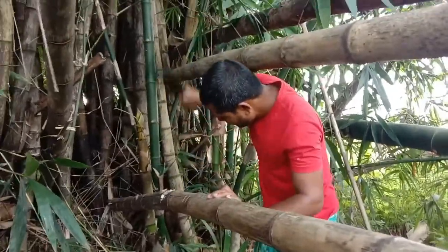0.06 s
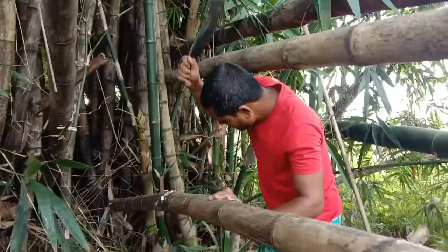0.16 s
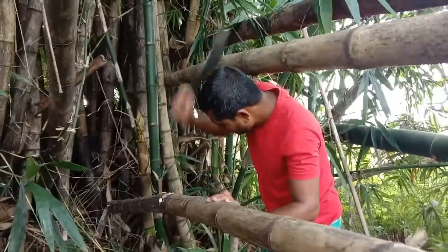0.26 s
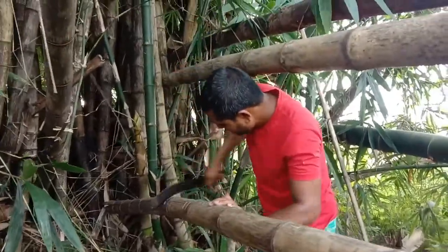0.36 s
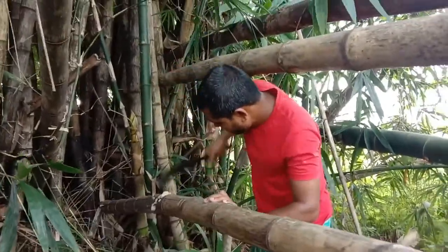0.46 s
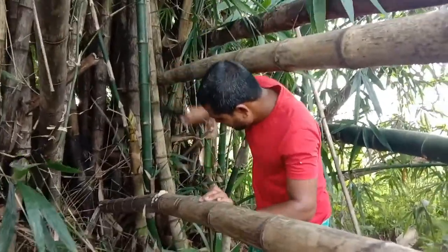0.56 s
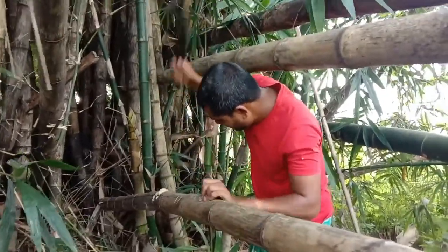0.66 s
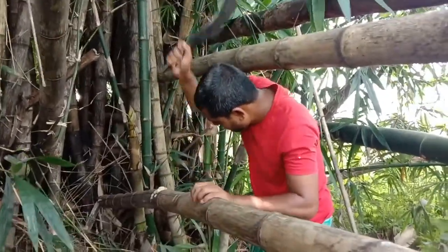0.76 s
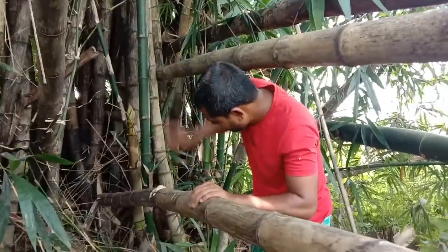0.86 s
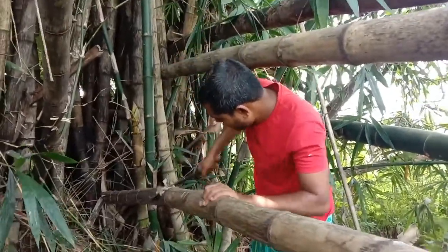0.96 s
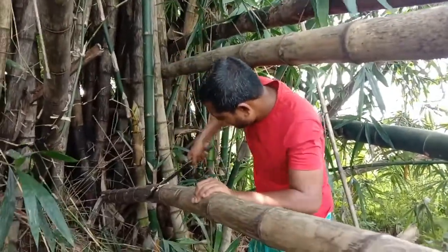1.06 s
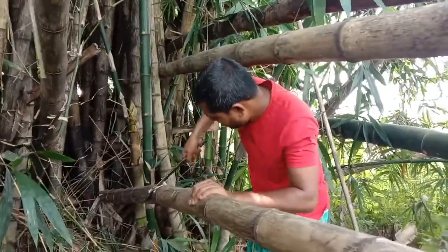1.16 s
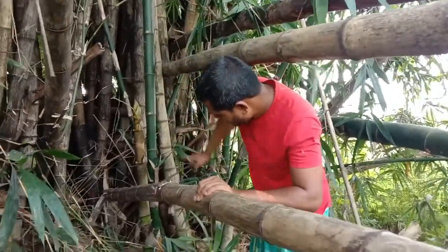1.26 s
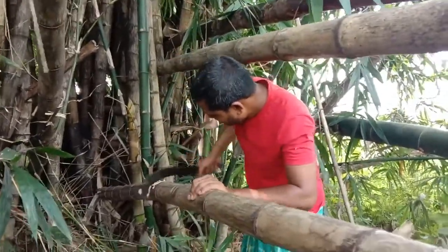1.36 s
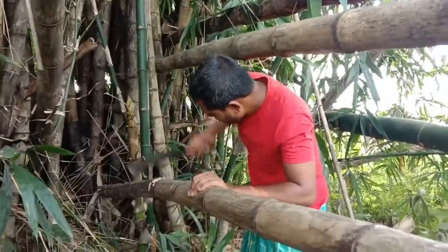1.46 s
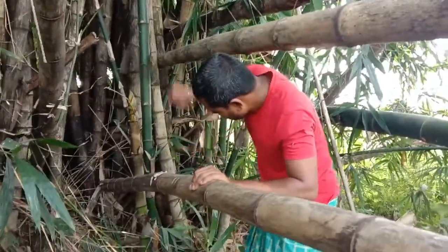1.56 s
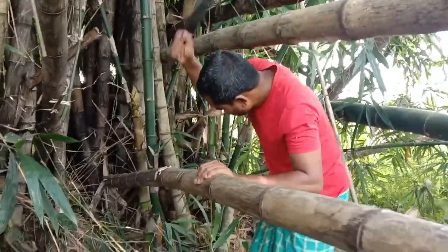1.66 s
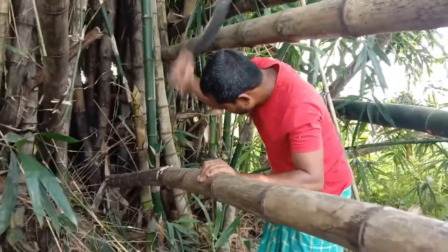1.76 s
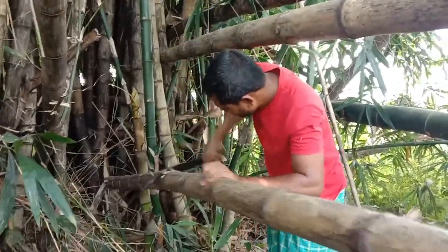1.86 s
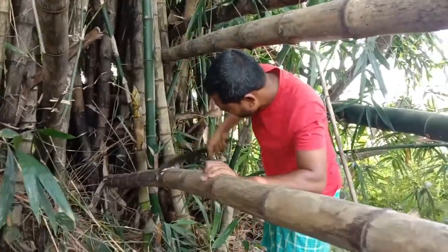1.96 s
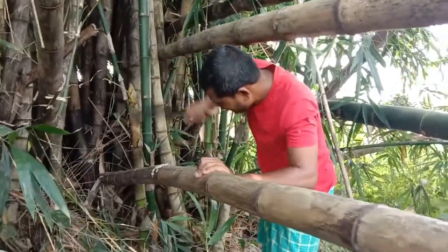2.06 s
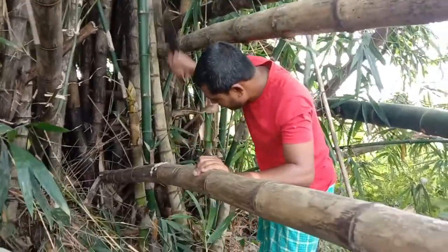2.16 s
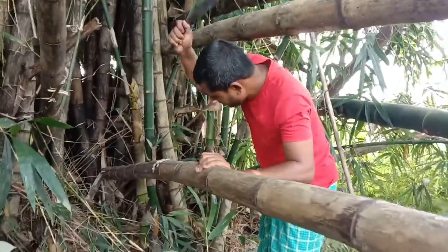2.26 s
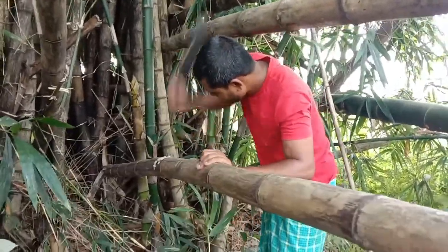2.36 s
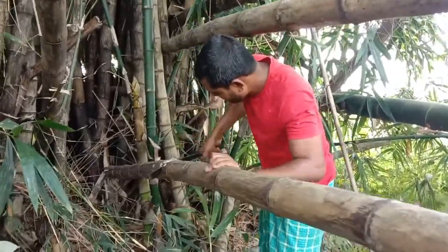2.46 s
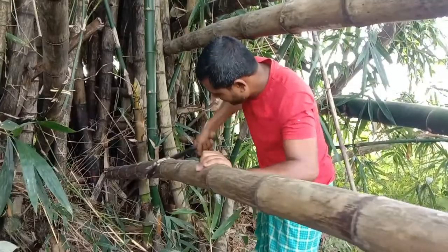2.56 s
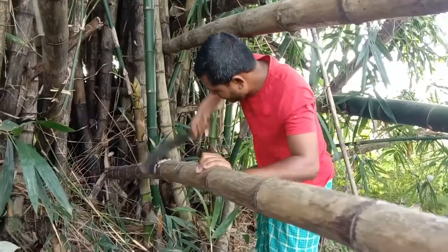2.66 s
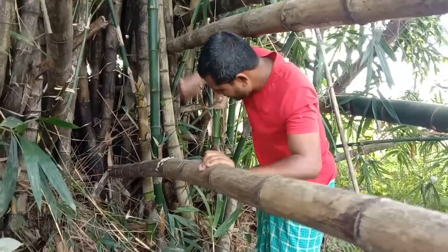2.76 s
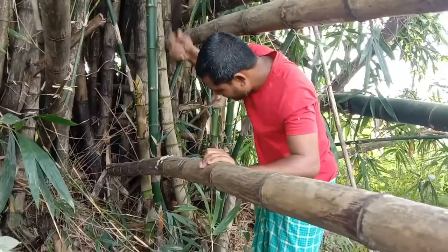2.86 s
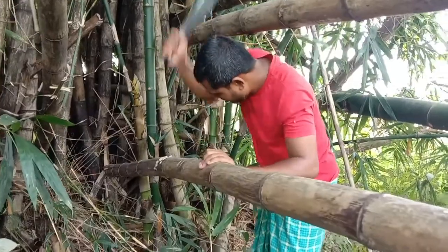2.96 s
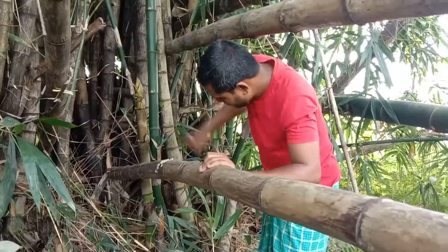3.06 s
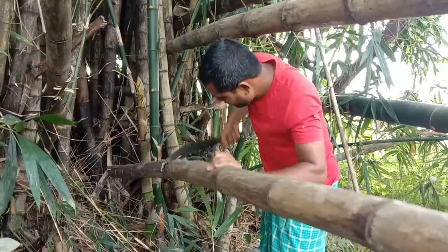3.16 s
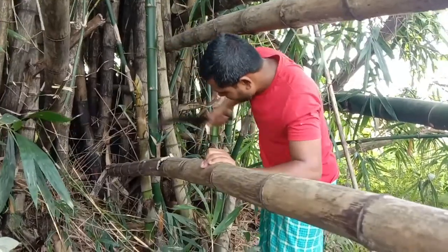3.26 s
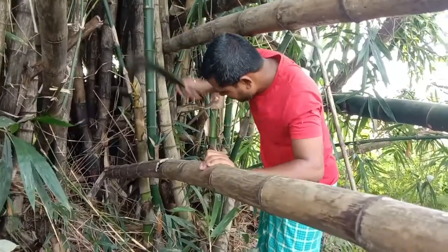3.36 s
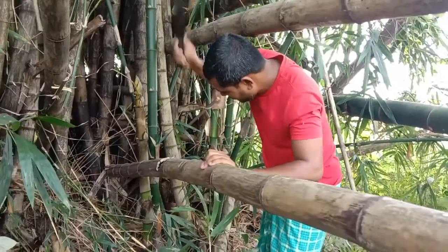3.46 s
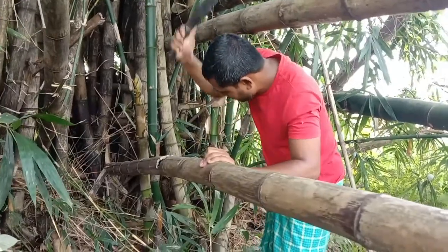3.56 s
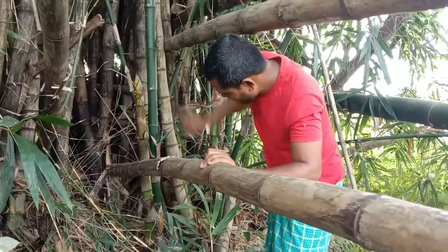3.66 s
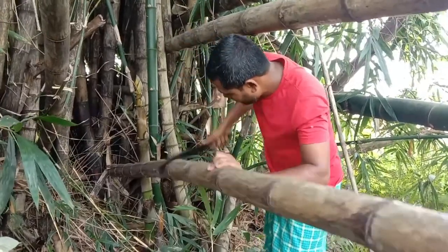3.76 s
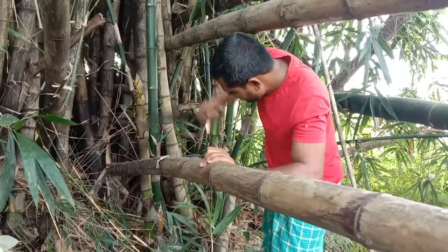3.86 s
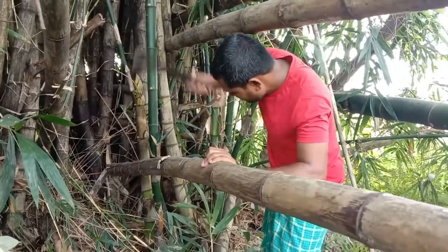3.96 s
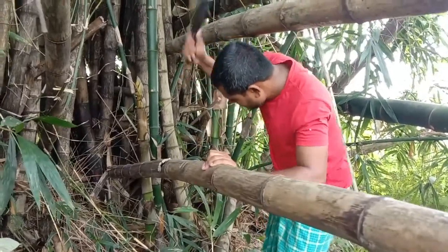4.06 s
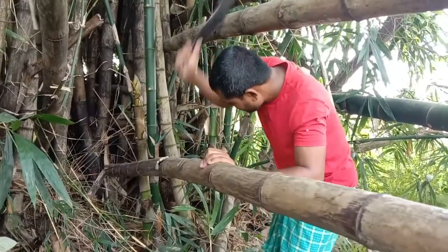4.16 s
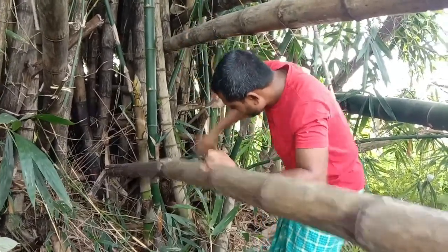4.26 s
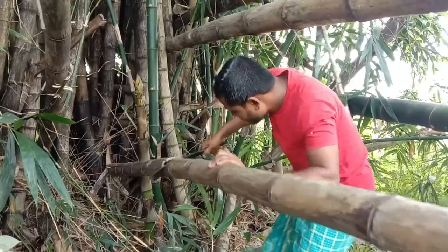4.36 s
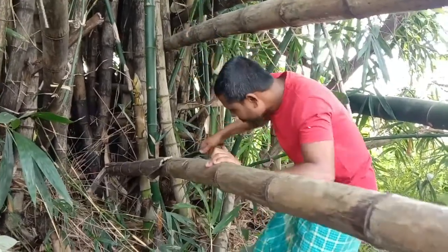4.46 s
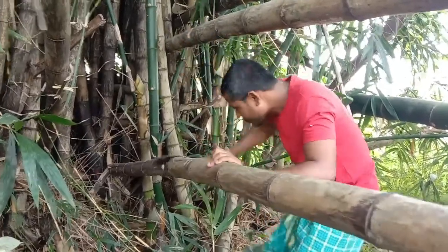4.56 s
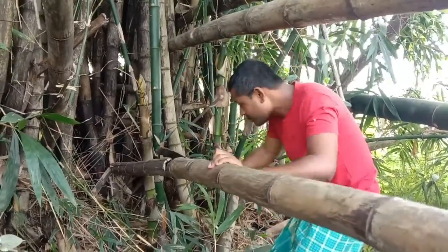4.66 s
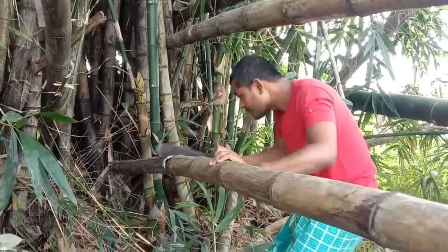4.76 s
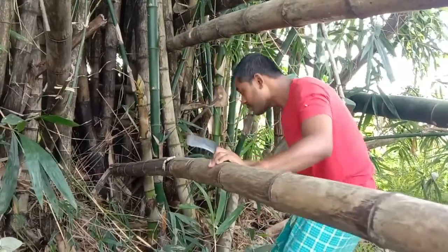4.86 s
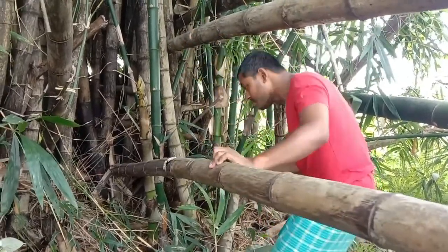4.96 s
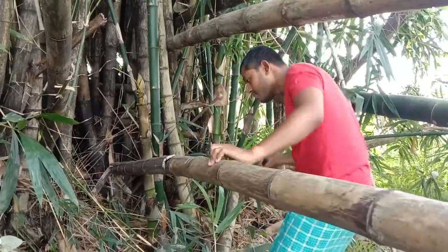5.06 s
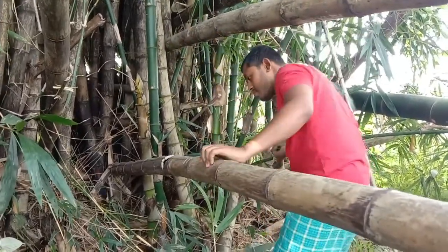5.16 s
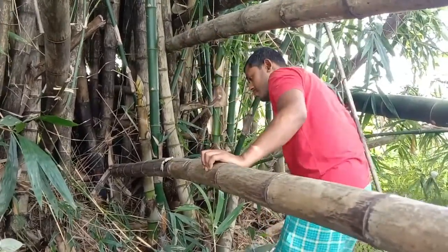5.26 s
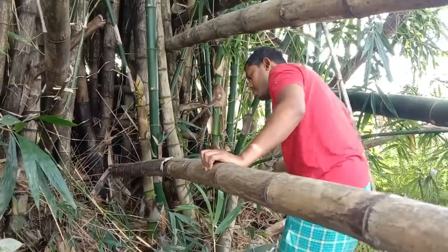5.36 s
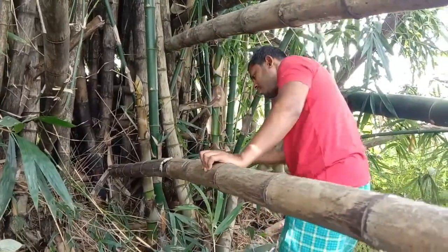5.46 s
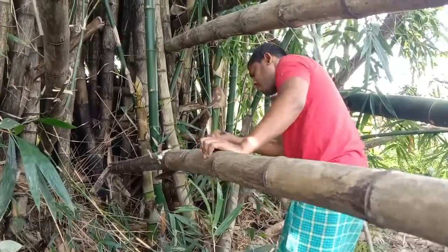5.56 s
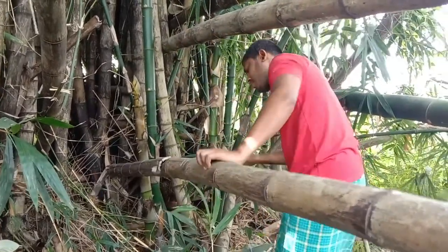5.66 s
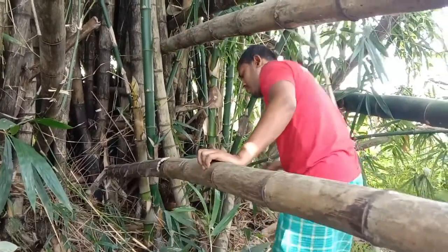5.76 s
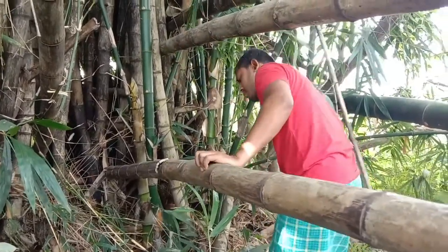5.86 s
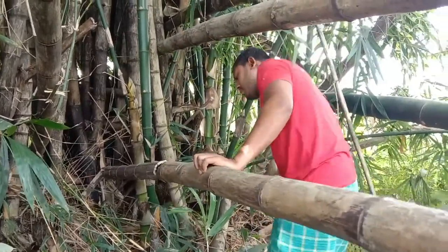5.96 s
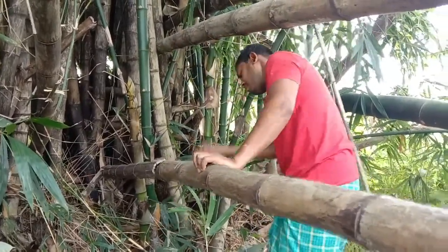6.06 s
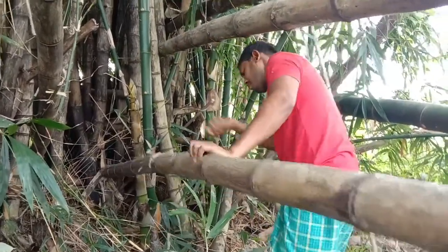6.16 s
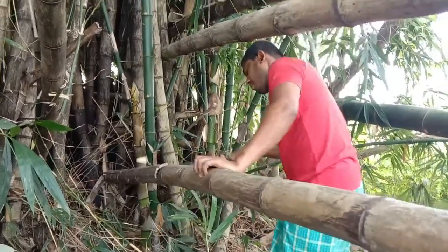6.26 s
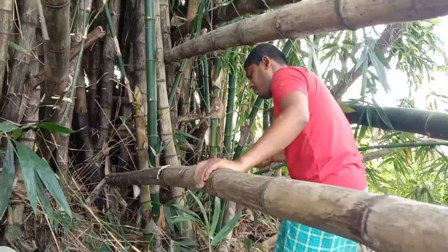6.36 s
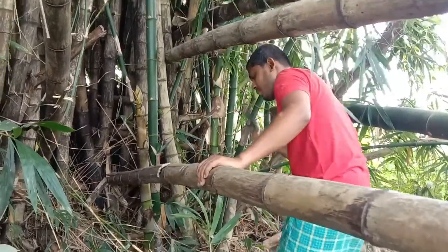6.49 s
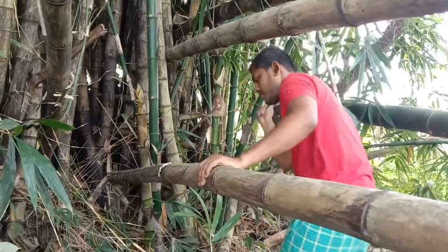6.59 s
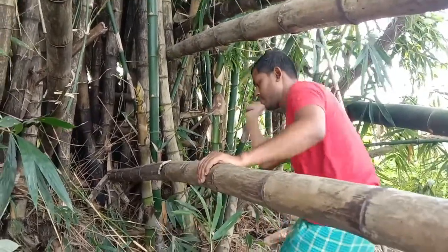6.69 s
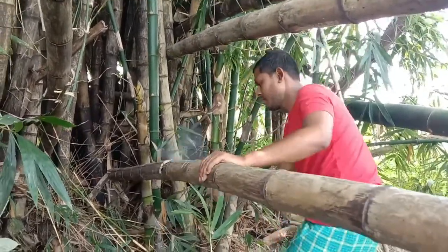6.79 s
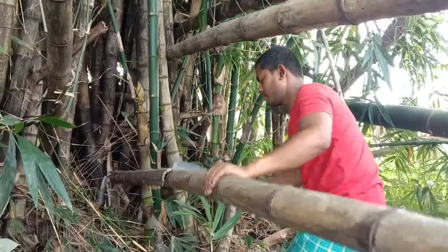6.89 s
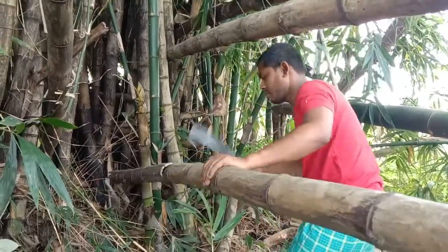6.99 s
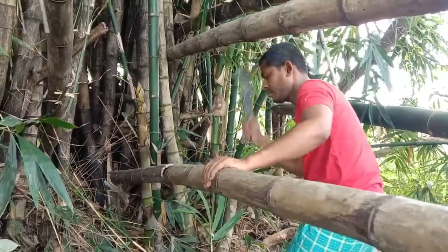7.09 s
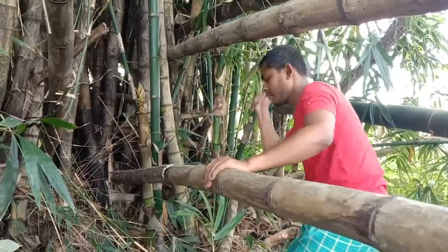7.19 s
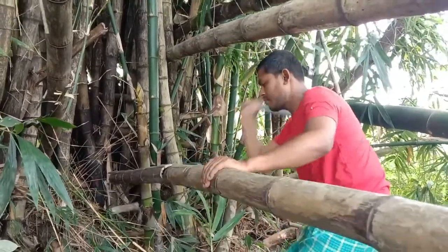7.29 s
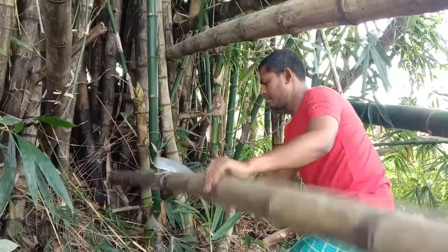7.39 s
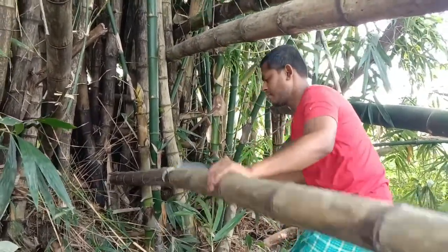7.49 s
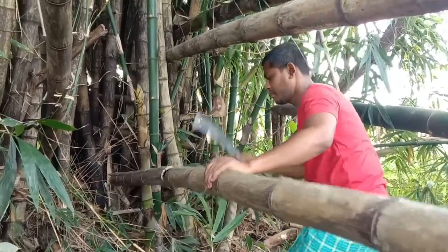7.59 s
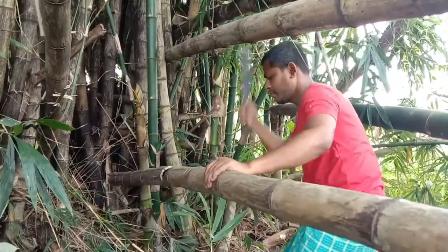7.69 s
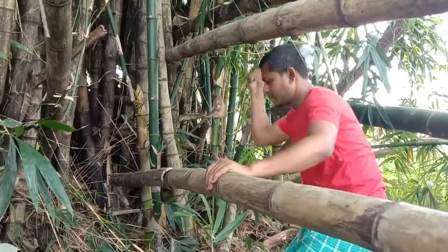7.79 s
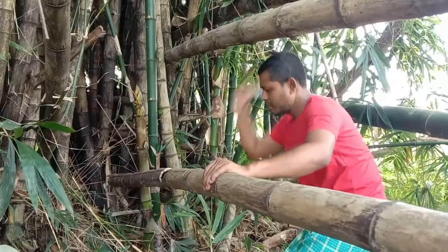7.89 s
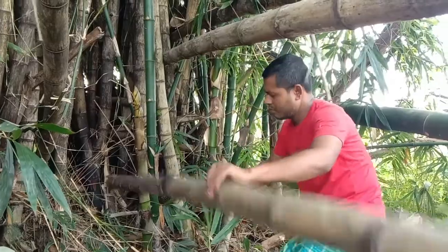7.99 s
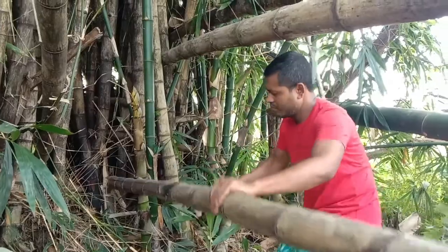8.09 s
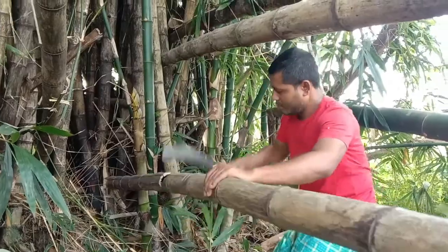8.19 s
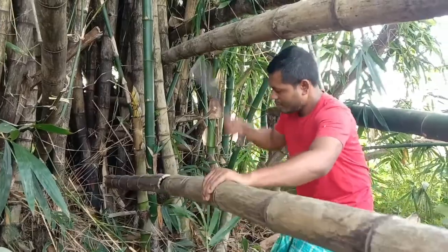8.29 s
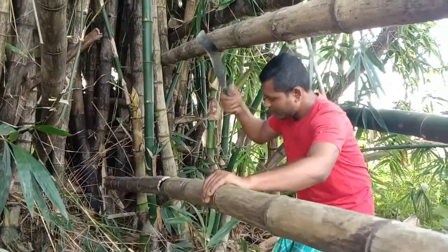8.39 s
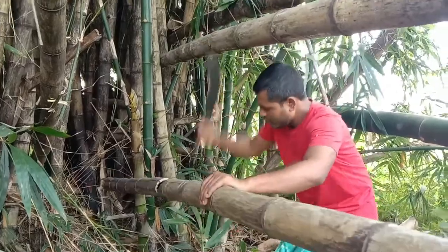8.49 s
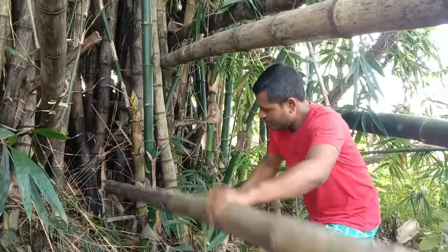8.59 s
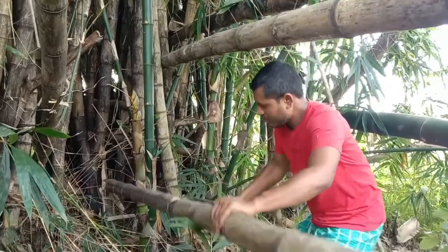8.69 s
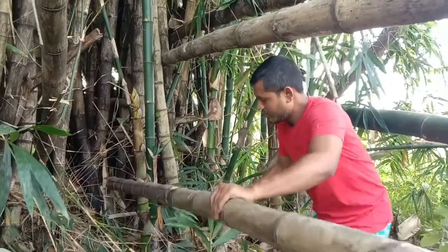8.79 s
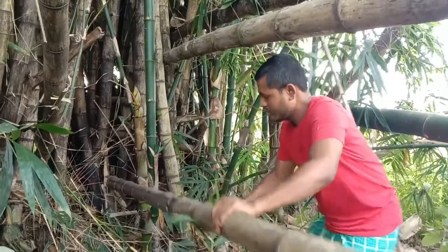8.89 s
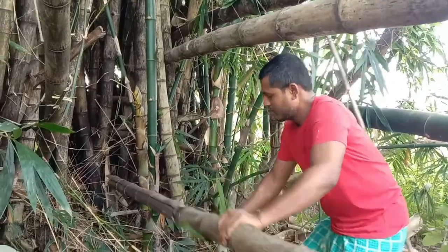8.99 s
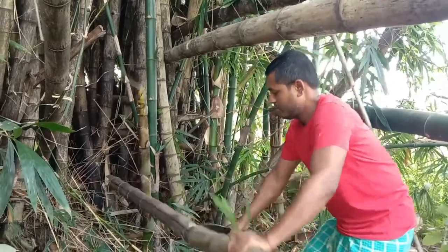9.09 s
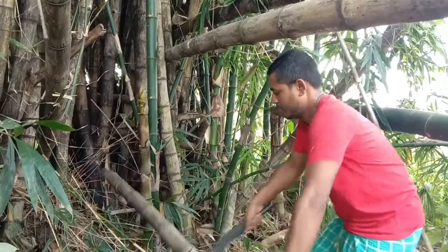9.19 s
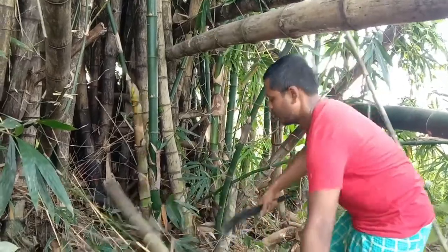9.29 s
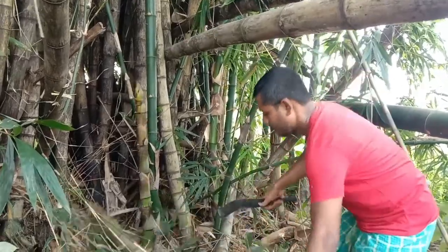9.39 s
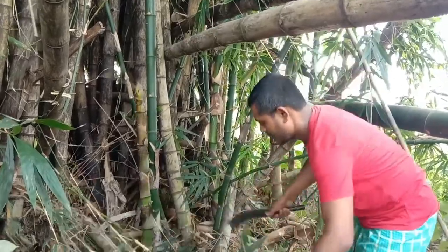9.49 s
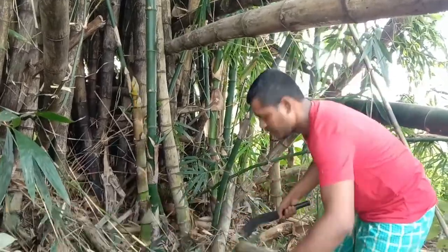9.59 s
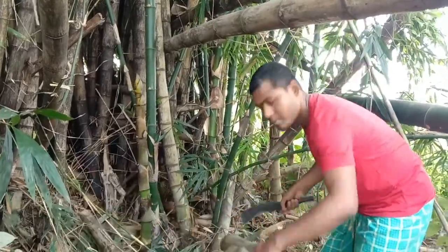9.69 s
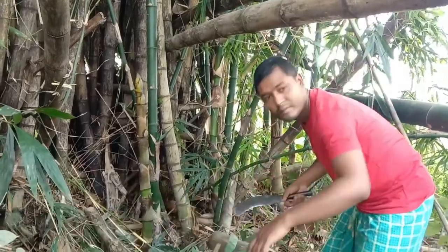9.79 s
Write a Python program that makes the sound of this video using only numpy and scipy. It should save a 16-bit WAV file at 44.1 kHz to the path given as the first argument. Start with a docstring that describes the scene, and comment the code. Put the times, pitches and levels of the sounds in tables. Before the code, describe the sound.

Sharp woody machete blows with short hollow notes ring in an outdoor grove, ending in a crackling break and rustling, knocking fall.

```python
"""A machete chops through a dry bamboo pole in a grove, a few metres from a phone microphone.
Each blow is a burst of tiny fibre fractures plus damped notes of the hollow pole; stems around scatter it back.
The blade is tugged free with a scuff and a wall note, and its grip clicks as it is raised.
At last the pole splinters, drops and drags through dry leaves, over a faint hiss of foliage."""
import sys
import numpy as np
from scipy import signal
from scipy.fft import rfft, irfft, next_fast_len
from scipy.io import wavfile
from scipy.ndimage import uniform_filter1d

SR = 44100
rng = np.random.default_rng(int(sys.argv[2]) if len(sys.argv) > 2 else 0)


def waveform_to_disk(signal):
    """Save audio, clipped to [-1, 1], as 16-bit WAV at the path in sys.argv[1]."""
    frames = np.transpose(np.atleast_2d(signal))
    scaled = np.clip(frames, -1, 1) * 32767
    samples = np.round(scaled).astype(np.int16)
    wavfile.write(sys.argv[1], SR, samples)


N = 433944

# All event levels are relative: each source adds its own offset.
# blows of the blade: (time [s], level [dB], bass [dB], treble [dB], hollow note [Hz], wall note [Hz],
#                      bite t60 [s], rattle of the clump [dB])
CHOPS = [(-.13, 2, 2.5, -3.5, 380, 900, 0.12, 6.5), (.451, -1.5, -6, -3, 401, 1116, 0.037, 3),
         (1.019, -1, -1, -0.5, 366, 582, 0.089, -1.5), (1.945, 0.5, -0.5, 2.5, 378, 1054, .08, -2),
         (2.519, 1.5, -2, 2, 371, 1053, 0.093, -3), (3.186, 1.5, -3, -.5, 398, 647, 0.053, -1.5),
         (3.812, 1, 1, 5, 378, 1034, .069, -4), (4.244, -3, 0.5, -17, 372, 560, 0.1, -25),
         (4.353, 1, .5, 0, 433, 992, 0.05, -2), (5.598, 1.5, 2, -1, 366, 1016, .075, -1.5),
         (6.187, 0.5, 2.5, -0.5, 357, 764, .075, 1.5), (6.898, 1, -3, -4.5, 390, 910, 0.049, 4.5),
         (7.487, 2.5, -1, -3, 348, 760, 0.12, 2.5), (8.094, 2, -1.5, -1, 372, 1110, .06, 0.5),
         (8.429, 0.5, -3.5, -5.5, 490, 933, 0.083, -3.5), (8.693, 2.5, 2.5, 1, 346, 752, 0.1, -1.5)]
# fibres snapping: (time [s], level [dB], bass [dB], treble [dB], t60 [s])
SNAPS = [(4.4235, -13.5, 6, -4, 0.083), (4.6714, -21, -12, 6.5, 0.17), (5.324, -15.5, 1.5, 2, 0.24),
         (5.7445, -12.5, 19.5, 1, .09), (8.0056, -19, -25, 14, 0.16), (8.1235, -5.5, 17, 2, .18),
         (8.176, -11, 22.5, 19, 0.11), (8.7693, -3, 7, 0, .11), (8.7798, -4.5, -8, 9.5, .089),
         (8.8545, -17, -19, -8, 0.052), (9.0459, -14, -24.5, 6, 0.2), (9.0681, -10, -2.5, -1, 0.18),
         (9.0977, 2, 5.5, 0.5, 0.13), (9.1548, 2.5, -6.5, .5, 0.084), (9.2086, 3.5, 2, -10.5, 0.083),
         (9.3413, -6, -0.5, -18.5, 0.19), (9.3832, -7.5, 23, 1, .15)]
# the blade clicks in its grip when raised: (time [s], level [dB])
CLICKS = [(0.746, -27.5), (1.3154, -22.5), (2.8259, -23), (3.1393, -24), (4.0745, -24.5), (4.6438, -22.5),
          (5.9239, -28), (6.534, -28.5), (7.0642, -21), (7.833, -36)]
# the blade is tugged in the cut and the wall sings: (time [s], level [dB])
TUGS = [(.221, -27), (.261, -29.5), (1.143, -21), (1.348, -19), (2.067, -24), (2.672, -27.5), (4.486, -21),
        (5.84, -25), (7.654, -21.5), (7.834, -34), (8.276, -22.5), (9.666, -24.5)]
# the pole knocks against its supports and lands: (time [s], level [dB], hollow note [Hz], note over scuff [dB])
KNOCKS = [(1.219, -29.5, 128, 12), (1.364, -19, 359, -2.5), (1.409, -16, 156, -2.5),
          (2.743, -15.5, 340, -11), (3.047, -39, 833, -7.5), (4.841, -21, 348, -11), (5.741, -13, 414, 4),
          (6.318, -18, 370, 10), (6.388, -18, 370, -3.5), (7.338, -29.5, 410, -14), (7.363, -30.5, 745, 1),
          (7.546, -15, 365, -7), (8.471, -8.5, 486, -12), (9.384, -13, 337, -1), (9.408, -9.5, 410, -2),
          (9.444, -13, 306, 1), (9.47, -14.5, 274, -1), (9.584, -23, 313, -25)]
# leaves and fibres rubbing: (time [s], nominal length [s], level [dB], treble [dB])
RUSTLES = [(0.641, 0.025, -29, 11.5), (0.846, 0.039, -36, 4), (1.289, 0.099, -28.5, -7),
           (1.448, .07, -41, 6), (1.526, 0.046, -35.5, 28.5), (1.731, 0.23, -40, 15),
           (2.196, 0.17, -44, 16.5), (3.44, 0.12, -38, 9), (3.618, .15, -40.5, 15), (4.05, .03, -36, 13),
           (4.546, 0.34, -34.5, 7), (4.944, 0.43, -47.5, 19), (6.755, .05, -35.5, 3.5),
           (7.049, 0.097, -27, -0.5), (7.284, 0.054, -37, 1.5), (7.378, 0.063, -32, 10),
           (7.454, .025, -28.5, 11), (8.816, 0.14, -27.5, 12.5), (9.201, 0.3, -19, 8),
           (9.45, .38, -33.5, 15.5), (9.61, 0.05, -25, 10), (9.806, 0.054, -31, -0.5)]
# modes of the pole, before damping by the hand: (frequency [Hz], level [dB], t60 [s])
POLE_MODES = [(191, -16, 0.27), (251.8, -11.5, 0.27), (346, -17, 0.54), (413, -6.5, 0.34),
              (616.6, 4.5, 0.14), (765, 1.5, 0.13), (1070, -4, 0.058), (1183.5, 6, 0.13), (1242, 1, 0.11),
              (1330, -14, 0.033), (1516, 0.5, 0.54), (1790, 4.5, 0.14), (2302, -6.5, 0.03),
              (2510, -15.5, 0.065), (3136, -20, 0.055)]
# modes of the loose grip: (frequency [Hz], level [dB], t60 [s])
GRIP_MODES = [(1290, -12, .09), (1900, -6, .03), (2190, -5, .035), (2476, -2, .04), (2750, -8, .02),
              (3290, 0, .04), (3620, -6, .025)]
# scatter from the stems, by band: (frequency [Hz], level [dB], t60 [s])
GROVE_BANDS = [(59, -5.5, 0.51), (152, 0.5, 0.27), (347, -4.5, 0.25), (820, -14.5, 0.51),
               (1300, -11.5, 0.42), (2500, -8.5, 0.66), (5400, -5.5, 0.63), (13000, -5, 0.41)]
# spectrum of the blade cracking fibres: (frequency [Hz], level [dB])
CRACK_SPECTRUM = [(24, -47.5), (40, -26), (960, -3), (1230, -1.5), (1470, -4.5), (2420, -7.5), (2960, -11),
                  (3530, -11), (4420, -15), (6760, -22.5), (8050, -28.5), (8680, -22.5), (13600, -41.5),
                  (14700, -33.5), (15800, -44.5)]
# spectrum of snapping fibre bundles: (frequency [Hz], level [dB])
SNAP_SPECTRUM = [(35, -55.5), (60, -20), (538, -12.5), (1250, -5), (1500, -3), (2750, -2), (4090, -7),
                 (5540, -8.5), (7160, -14), (8050, -13), (9480, -15), (14800, -25), (15800, -20)]
# spectrum of soft contacts with the pole: (frequency [Hz], level [dB])
KNOCK_SPECTRUM = [(29, -40.5), (50, -28.5), (292, -2.5), (519, -5), (1130, -1.5), (1270, 0.5), (1870, 0.5),
                  (3480, -8.5), (4280, -7.5), (6760, -23), (8130, -16.5), (12000, -27), (15600, -72),
                  (22000, -120)]
# spectrum of dry leaves and twigs: (frequency [Hz], level [dB])
LEAF_SPECTRUM = [(35, -55), (60, -27.5), (188, -11), (501, -10.5), (728, -7.5), (1110, -9), (1270, -0.5),
                 (1770, -0.5), (3560, -4), (4290, -7.5), (6680, -17), (8050, -19), (14800, -27.5),
                 (15800, -29)]
# spectrum of the foliage hiss: (frequency [Hz], level [dB])
AIR_SPECTRUM = [(30, -26.5), (80, -1.5), (200, -7), (480, -9), (900, -7), (1300, -2.5), (2400, -5.5),
                (3300, -7), (4200, -8), (5300, -0.5), (6500, -15.5), (9000, -9.5), (15000, -26)]
# low shake of the clump under a blow: (frequency [Hz], level [dB])
SHAKE_SPECTRUM = [(25, -18.5), (70, -12), (200, -1), (400, -3.5), (900, -33), (4000, -74.5)]
# tap of the tang on the handle: (frequency [Hz], level [dB])
TICK_SPECTRUM = [(300, -20), (1200, -2), (2200, 6), (3600, -1.5), (4600, -18.5), (15000, -33.5)]
# response of the microphone: (frequency [Hz], gain [dB])
MICROPHONE = [(900, -2.5), (1100, -4.5), (1270, 2), (1450, -4), (3500, -4), (4500, -10), (5600, -3),
              (7200, -0.5), (8200, -12.5), (9500, -6), (15000, -3.5)]

AIR_DB, TOP_HZ = -49, 15600
TONE_START_S, TONE_LENGTH_S, TONE_FADE_S, TONE_DB = .845, .18, .02, -48
TONE_HZ, TONE_DROP_HZ, TONE_DROP_S, TONE_SAG_HZ_PER_S = 264, 100, 0.025, 150
TWIG_DB, TWIG_RANGE_DB, TWIG_T60_S = -45.5, 6, 0.042
LEAF_RING_DB, SCATTER_RING_DB = -4, -9
SPLINTER_T60_S, SPLINTER_DB = 0.019, 1
STEM_TAP_DB, GROVE_DB, KNOCK_ECHO_DB = -14.5, -10, -15
CONTACT_RISE_S, CONTACT_DB = 0.0066, -4.5
KNOCK_T60_S, KNOCK_BODY_DB = 0.09, -11.5
TUG_HZ, TUG_SPREAD, TUG_NOTE_DB, TUG_T60_S = 1227, 0.025, -5, .1  # spread is a fraction of the pitch
GRIP_DB, GRIP_TICK_DB = 4.5, -3.5
SNAP_RISE_S, SNAP_DB = 0.0018, -2.5
BITE_RISE_S, BITE_HOLD_S = 0.002, 0.0083  # the hold counts from the start of the bite
CHOP_DELAY_S, CHOP_DB = .0015, -0.88
CRACK_DB, POLE_DB, SHAKE_DB, RATTLE_DB = 1.5, -6.5, -24.5, -16
HOLLOW_DB, HOLLOW_T60_S = -5, 0.096
WALL_DB, WALL_T60_S = -6, 0.095  # the wall's note depends on where the edge lands
BELLY_HZ, BELLY_DB, BELLY_T60_S = 258, -10.5, 0.078  # low note of the tube
# a bassy blow rings the hollow more; a bright one also cracks harder [dB per dB]
HOLLOW_PER_BASS, BELLY_PER_BASS, CRACK_PER_TREBLE = 0.37, 1.2, 0.49


def undb(db):
    """Decibels to gain."""
    return 10 ** (np.asarray(db) / 20)


def unit(x):
    """Scale to rms 1."""
    return x / np.sqrt(np.mean(x ** 2))


def peak(x):
    """Scale so that the loudest 5 ms have rms 1."""
    return x / np.sqrt(uniform_filter1d(x ** 2, size=220).max())


def clock(seconds):
    """Sample times of a short sound."""
    return np.arange(int(seconds * SR)) / SR


def fade(t, t60):
    """Exponential decay, 60 dB down at t60, which is at least 4 ms."""
    return np.exp(-np.log(1000) * t / max(t60, .004))


def attack(t, rise_s):
    """Linear rise to full strength."""
    return np.minimum(t / rise_s, 1)


def walk(rate, count=N):
    """Random drift through normal draws, `rate` of them a second, joined by straight lines."""
    knots = np.arange(0, count + SR, SR / rate)
    return np.interp(np.arange(count), knots, rng.standard_normal(len(knots)))


def add(track, s, x):
    """Mix a sound into the track at time s, cutting what falls outside."""
    i = int(s * SR)
    x, i = x[max(-i, 0):], max(i, 0)
    track[i:i + len(x)] += x[:N - i]


def colour(x, *spectra):
    """Causal minimum-phase filter through one or more lists of (frequency [Hz], gain [dB])."""
    size = 2 * next_fast_len(len(x) // 2 + 1024)
    log_f = np.log(np.maximum(np.arange(size // 2 + 1) * SR / size, 1))
    db = sum(np.interp(log_f, np.log(hz), gain) for hz, gain in map(np.transpose, spectra))
    # folding the cepstrum onto positive times gives minimum phase
    cepstrum = irfft(np.log(undb(db)))
    cepstrum[1:size // 2] *= 2
    cepstrum[size // 2 + 1:] = 0
    response = np.exp(rfft(cepstrum))
    return irfft(rfft(x, size) * response)[:len(x)]


def grains(t, spread_db, ring_db):
    """Dense tiny fractures of uneven size, ringing in a bundle of splinters with its own random notes."""
    size = np.repeat(rng.standard_normal(len(t)), repeats=16)[:len(t)]
    breaks = rng.standard_normal(len(t)) * undb(spread_db * size)
    short = clock(.03)
    splinters = np.diff(rng.standard_normal(len(short) + 1)) * fade(short, SPLINTER_T60_S)
    splinters = signal.lfilter([1], [1, -.9], splinters)
    ringing = signal.fftconvolve(breaks, splinters / np.linalg.norm(splinters))[:len(t)]
    return unit(breaks + undb(ring_db) * ringing)


def ring(t, modes, detune, scatter_db):
    """Damped modes; pitch and share vary with where the blow lands, and the hand limits t60 to 0.22 s."""
    out = 0
    for hz, db, t60 in modes:
        level = undb(db + scatter_db * rng.standard_normal()) * rng.choice([-1, 1])
        pitch = hz * (1 + detune * rng.standard_normal())
        out = out + level * fade(t, min(t60, .22)) * np.sin(2 * np.pi * pitch * t)
    return out


def burst(spectrum, bass_db, treble_db, rise_s, t60, spread_db):
    """A short run of fractures or rubbing contacts with its own bass and treble."""
    t = clock(.3)
    push = attack(t, rise_s) * fade(np.maximum(t - rise_s, 0), t60)
    tilt = [(300, bass_db), (1200, 0), (5000, treble_db)]
    return peak(colour(grains(t, spread_db, SPLINTER_DB) * push, spectrum, tilt))


def contact(hz, note_db, t60, bass_db, treble_db):
    """A soft contact builds up slowly: a scuff that brings out one note of the pole."""
    t = clock(.3)
    scuff = burst(KNOCK_SPECTRUM, bass_db, treble_db, CONTACT_RISE_S, t60, spread_db=3.5)
    modes = [(hz, 0, t60), (1.4 * hz, -9, 0.23 * t60)]
    note = peak(attack(t, 0.0056) * ring(t, modes, detune=0.0018, scatter_db=7))
    return undb(CONTACT_DB) * peak(scuff + undb(note_db) * note)


def air():
    """Faint hiss of foliage: coloured noise, swelling a little."""
    hiss = unit(colour(rng.standard_normal(N), AIR_SPECTRUM))
    swell_db = 1.1 * walk(4) + .7 * walk(25)
    return hiss * undb(AIR_DB + swell_db)


def low_tone():
    """A nearly pure, sinking tone with a weak octave."""
    out, t = np.zeros(N), clock(TONE_LENGTH_S)
    hz = TONE_HZ + TONE_DROP_HZ * np.exp(-t / TONE_DROP_S) - TONE_SAG_HZ_PER_S * t
    phase = 2 * np.pi * np.cumsum(hz) / SR
    swell = np.minimum(np.minimum(t, t[-1] - t) / TONE_FADE_S, 1)
    tone = np.sin(phase) + undb(-14) * np.sin(2 * phase)
    add(out, TONE_START_S, undb(TONE_DB) * swell * tone)
    return out


def twigs():
    """Dry twigs and leaves tick at random in the shaken clump: short bursts of uneven size and brightness."""
    out = np.zeros(N)
    for when, size, bright in rng.random((36, 3)):
        tick = burst(LEAF_SPECTRUM, bass_db=-4, treble_db=16 * bright, rise_s=.002, t60=TWIG_T60_S, spread_db=4)
        add(out, when * N / SR, tick * undb(TWIG_DB + TWIG_RANGE_DB * size))
    return out


def leaves():
    """Dry leaves and split fibres crackle in uneven spurts as the pole shifts."""
    out = np.zeros(N)
    for s, length, db, treble_db in RUSTLES:
        t = clock(1.634 * length)  # leaves room for the soft ends of the swell
        contacts = grains(t, spread_db=6, ring_db=LEAF_RING_DB)
        crackle = colour(contacts, LEAF_SPECTRUM, [(1500, 0.0097), (8000, treble_db)])
        swell = np.sin(np.pi * (t / t[-1]) ** .65).clip(0) ** 2  # rises faster than it falls
        add(out, s - 0.092 * length, undb(db) * unit(crackle) * swell)
    return out * undb(2 * walk(70))


def scatter():
    """Uneven return from many stems and leaves: it builds up and then dies band by band."""
    t = clock(.8)
    hz, db, t60 = np.transpose(GROVE_BANDS)
    returns = grains(t, spread_db=2, ring_db=SCATTER_RING_DB) * undb(1.2 * walk(110, count=len(t)))
    spectrum = rfft(returns)
    log_f = np.log(np.maximum(np.arange(len(spectrum)) * SR / len(t), 1))
    echo = 0
    for share, band_db, band_t60 in zip(np.eye(len(hz)), db, t60):
        flicker = undb(1.5 * walk(60, count=len(t)))
        shape = (1 - np.exp(-(t / 0.034) ** 2)) * fade(t, band_t60) * flicker
        band = irfft(spectrum * np.interp(log_f, np.log(hz), share), len(t))
        echo = echo + undb(band_db) * band * shape / np.linalg.norm(shape)
    return echo


def stems():
    """After each blow, jolted neighbouring stems tap each other and ring briefly; later taps are weaker."""
    out, t = np.zeros(N), clock(.12)
    for s, db, *_, rattle_db in CHOPS:
        for when, pitch, size in rng.random((12, 3)):
            delay = .015 + .22 * when ** 1.5
            hz = 400 * 9 ** pitch
            tap = attack(t, .004) * fade(t, .085) * np.sin(2 * np.pi * hz * t)
            level = undb(db + rattle_db + STEM_TAP_DB - 5 * size) * fade(delay, 0.46)
            add(out, s + delay, tap * level)
    return out


def knocks():
    """The pole bumps with a hollow note, and its other modes answer softly."""
    out, t = np.zeros(N), clock(.3)
    for s, db, hz, note_db in KNOCKS:
        bump = contact(hz, note_db, KNOCK_T60_S, bass_db=10.5, treble_db=-1.5)
        body = peak(attack(t, CONTACT_RISE_S) * ring(t, POLE_MODES, detune=.03, scatter_db=5))
        add(out, s, undb(db) * (bump + undb(KNOCK_BODY_DB) * body))
    return out


def grip():
    """The tang taps the wooden handle at the top of the swing: a noise tick and modes of the loose grip."""
    out, t = np.zeros(N), clock(0.13)
    for s, db in CLICKS:
        tick = colour(rng.standard_normal(len(t)) * fade(t, 0.042), TICK_SPECTRUM)
        wood = ring(t, GRIP_MODES, detune=.012, scatter_db=2) * attack(t, .002)
        click = peak(peak(wood) + undb(GRIP_TICK_DB) * peak(tick))
        add(out, s, undb(db + GRIP_DB) * click)
    return out


def tugs():
    """Working the blade free scuffs the cut and rings the wall of the pole."""
    out = np.zeros(N)
    for s, db in TUGS:
        hz = TUG_HZ * (1 + TUG_SPREAD * rng.standard_normal())
        add(out, s, undb(db) * contact(hz, TUG_NOTE_DB, TUG_T60_S, bass_db=-13.5, treble_db=-5.5))
    return out


def snaps():
    """Bundles of fibres give way with a crack made of dense small fractures."""
    out = np.zeros(N)
    for s, db, bass_db, treble_db, t60 in SNAPS:
        snap = burst(SNAP_SPECTRUM, bass_db, treble_db, SNAP_RISE_S, t60, spread_db=-1.5)
        add(out, s, undb(db + SNAP_DB) * snap)
    return out


def chops():
    """The edge bites for a few ms, crushing fibres and ringing the pole; the jolt rattles the whole clump."""
    out, t = np.zeros(N), clock(0.57)
    for s, db, bass_db, treble_db, hollow_hz, wall_hz, t60, rattle_db in CHOPS:
        tone = [(70, -4), (250, bass_db), (400, bass_db), (950, 0),
                (2400, CRACK_PER_TREBLE * treble_db), (7000, treble_db)]
        bite = attack(t, BITE_RISE_S) * fade(np.maximum(t - BITE_HOLD_S, 0), t60)
        crack = peak(colour(grains(t, spread_db=2.5, ring_db=SPLINTER_DB) * bite, CRACK_SPECTRUM))
        pole = peak(ring(t, POLE_MODES, detune=0.027, scatter_db=1.5))
        struck = [(hollow_hz, HOLLOW_DB + HOLLOW_PER_BASS * bass_db, HOLLOW_T60_S),
                  (wall_hz, WALL_DB, WALL_T60_S),
                  (BELLY_HZ, BELLY_DB + BELLY_PER_BASS * bass_db, BELLY_T60_S)]
        notes = ring(t, struck, detune=.004, scatter_db=.8)
        shake = peak(colour(rng.standard_normal(len(t)) * fade(t, 0.36), SHAKE_SPECTRUM))
        body = undb(CRACK_DB) * crack + undb(POLE_DB) * pole + notes + undb(SHAKE_DB) * shake
        add(out, s + CHOP_DELAY_S, peak(colour(body, tone)) * undb(db + CHOP_DB))
        rattle = peak(colour(scatter(), CRACK_SPECTRUM, tone))
        add(out, s, rattle * undb(db + rattle_db + RATTLE_DB))
    return out


def scene():
    """Blows, splintering and handling in the grove; sharp sounds scatter back more than soft knocks."""
    background = air() + low_tone() + leaves()
    soft = knocks()
    sharp = twigs() + grip() + tugs() + snaps()
    sent = undb(GROVE_DB) * sharp + undb(KNOCK_ECHO_DB) * soft
    echo = signal.fftconvolve(sent, scatter())[:N]
    return (background + echo + soft + sharp + stems() + chops())[None]


def record(dry):
    """The phone microphone has a narrow peak and a notch; loud peaks clip, then rumble and top are cut."""
    heard = colour(dry[0], MICROPHONE)
    clipped = np.clip(heard, -1, 1)
    rumble_cut = signal.butter(1, 50, "high", fs=SR, output="sos")
    top_cut = signal.ellip(10, .2, 80, TOP_HZ, fs=SR, output="sos")
    return signal.sosfilt(top_cut, signal.sosfilt(rumble_cut, clipped))[None]


dry = scene()
out = record(dry)
waveform_to_disk(out)
```